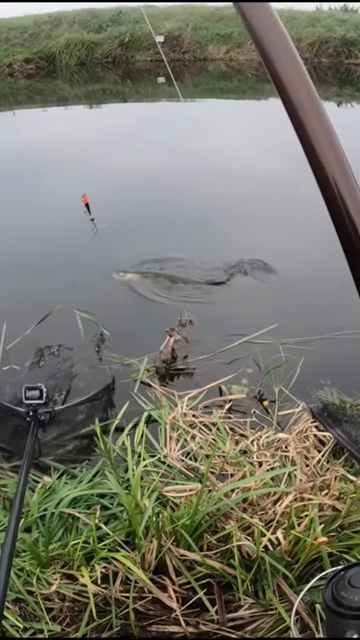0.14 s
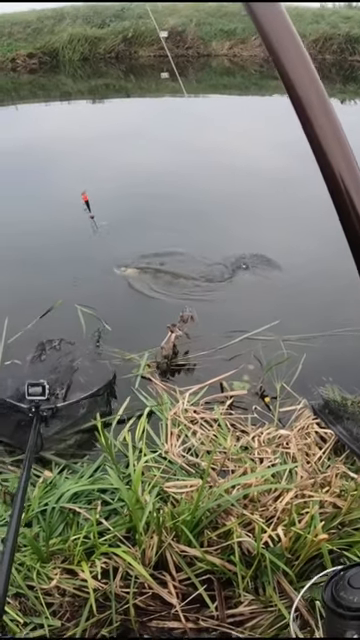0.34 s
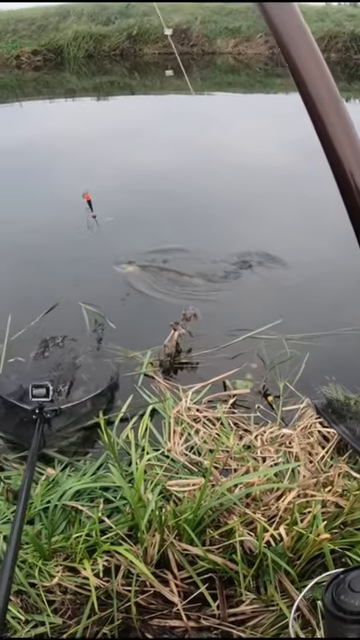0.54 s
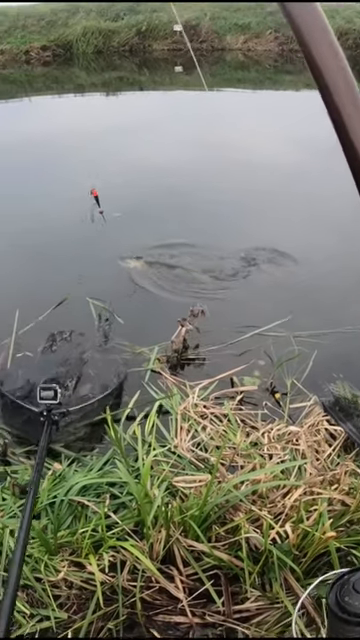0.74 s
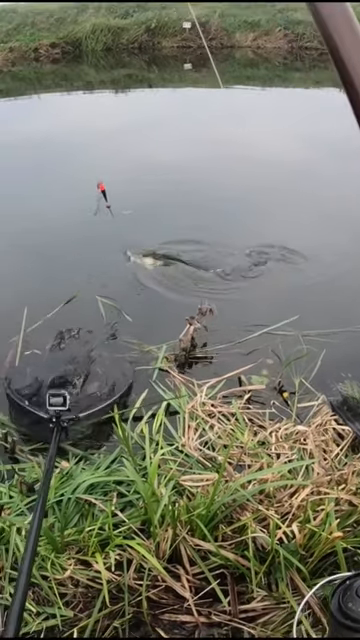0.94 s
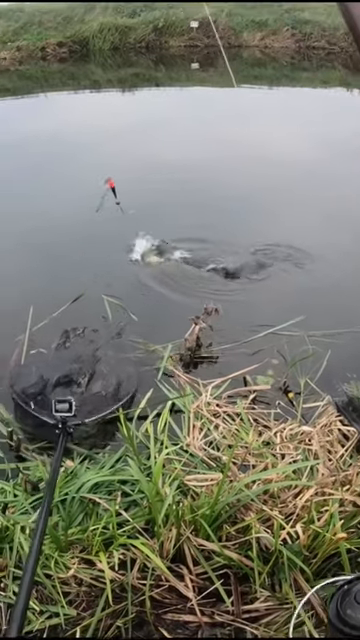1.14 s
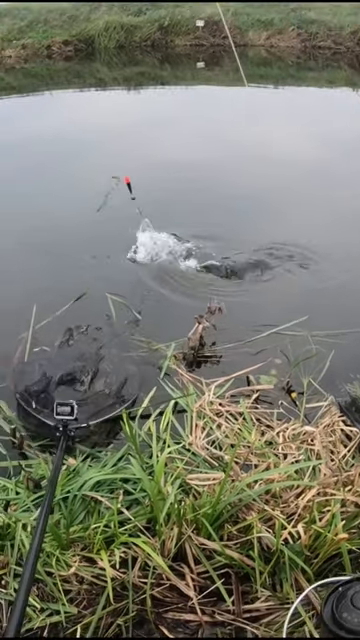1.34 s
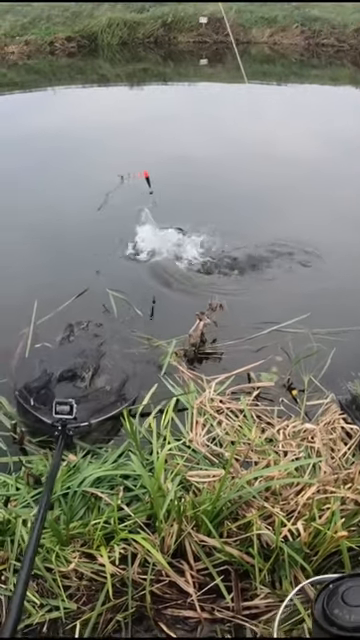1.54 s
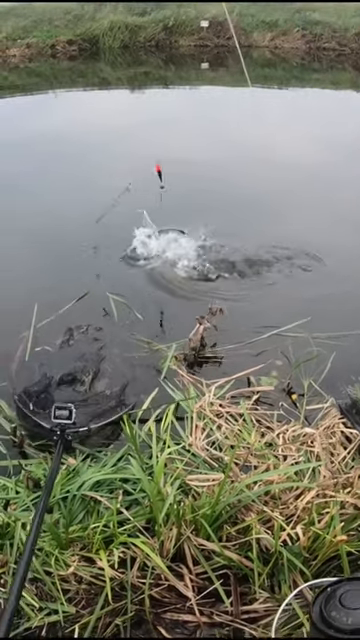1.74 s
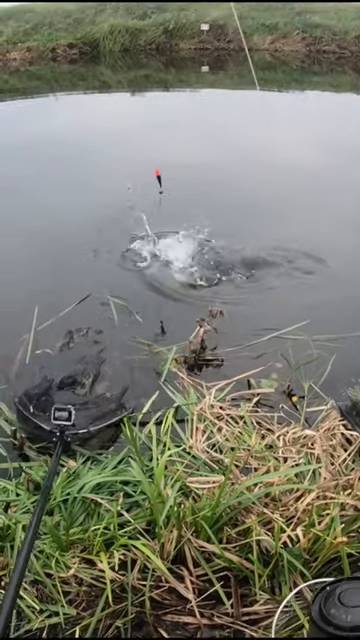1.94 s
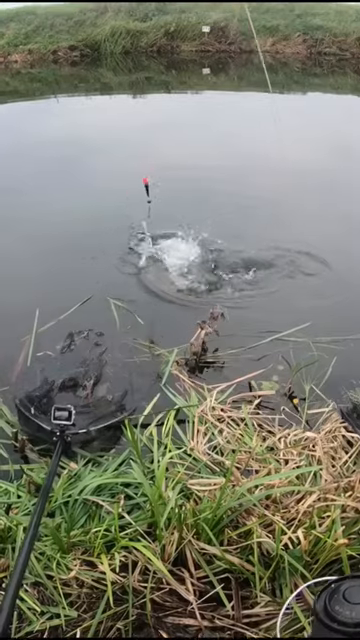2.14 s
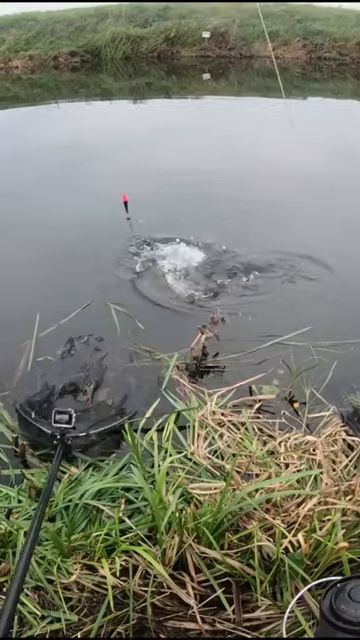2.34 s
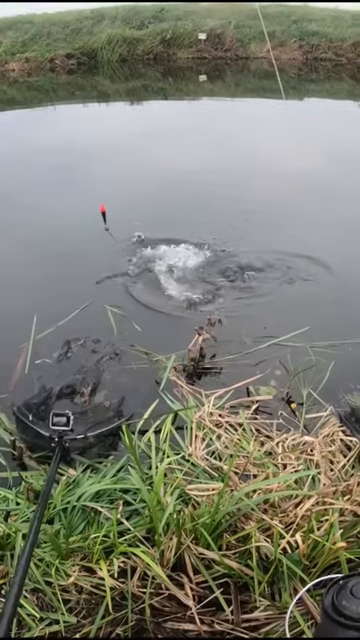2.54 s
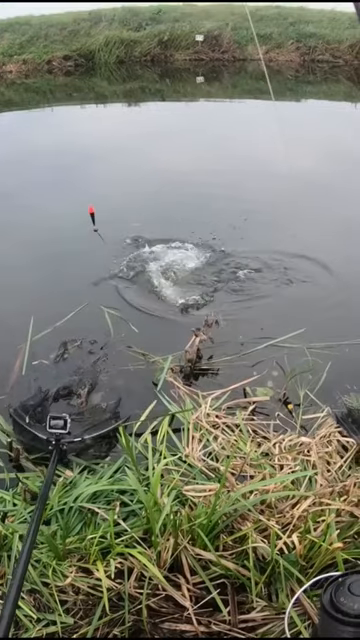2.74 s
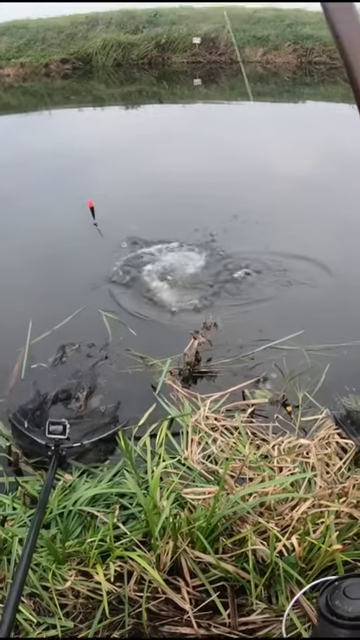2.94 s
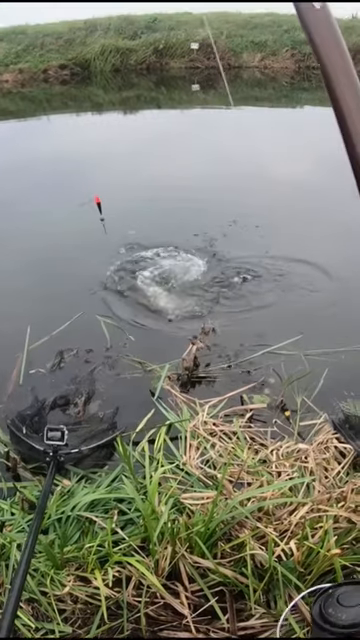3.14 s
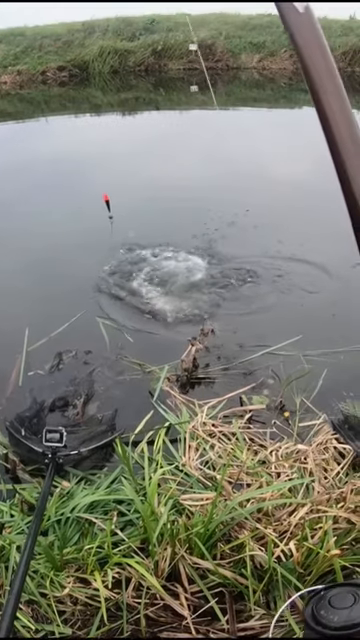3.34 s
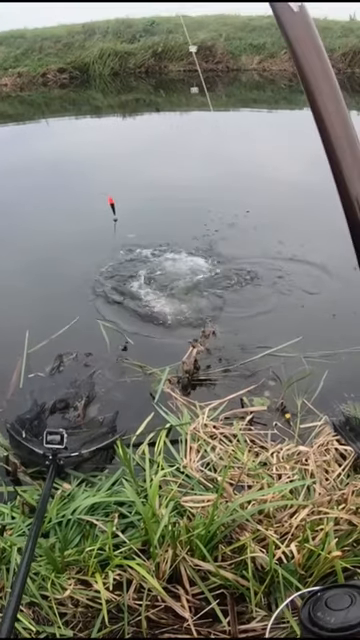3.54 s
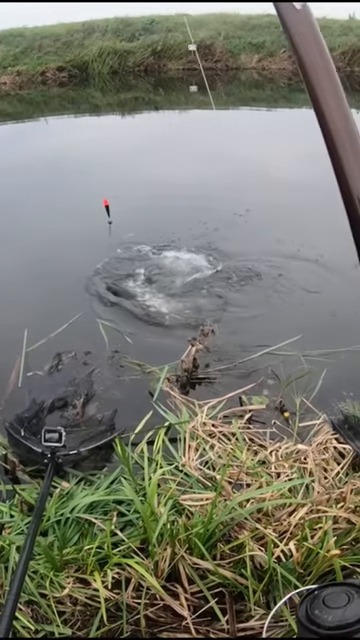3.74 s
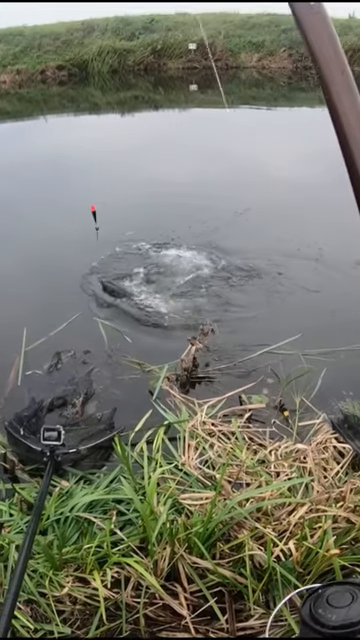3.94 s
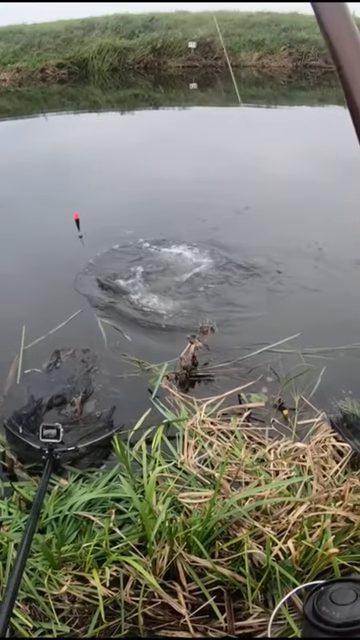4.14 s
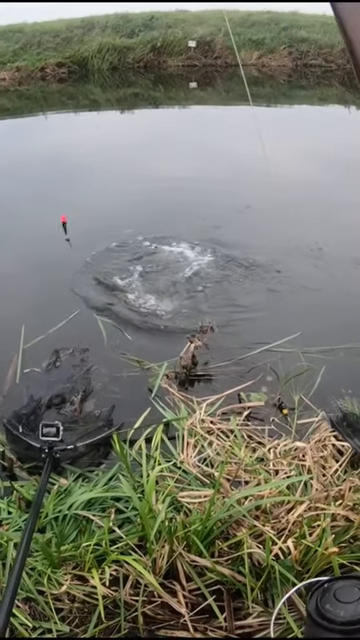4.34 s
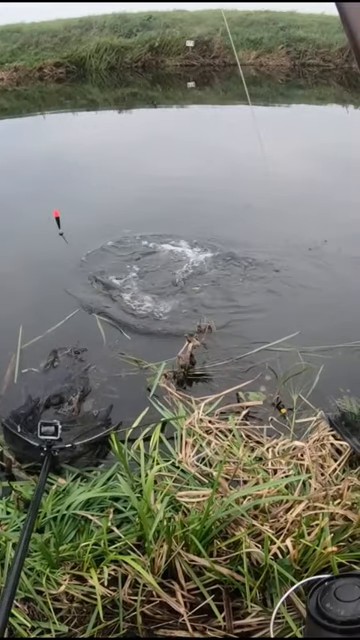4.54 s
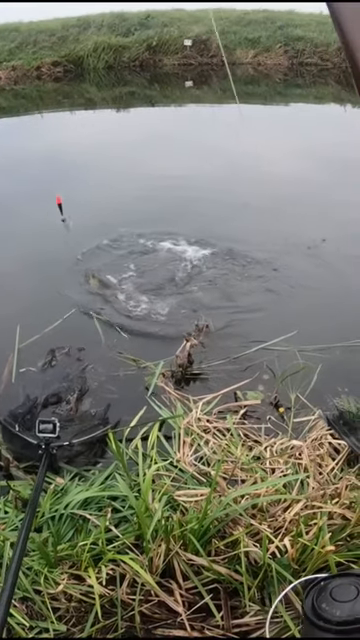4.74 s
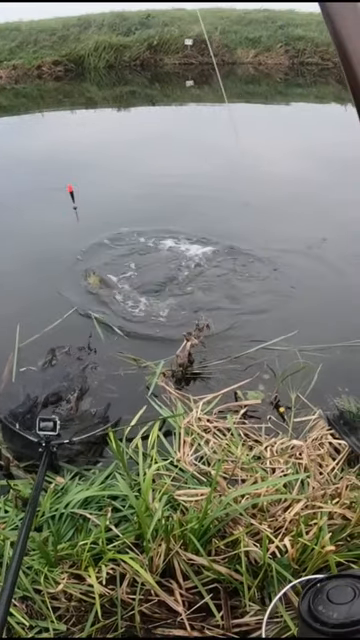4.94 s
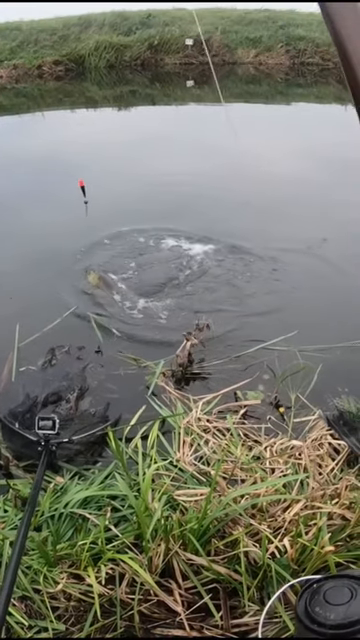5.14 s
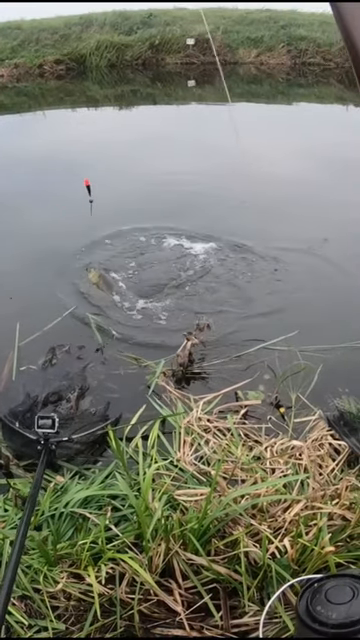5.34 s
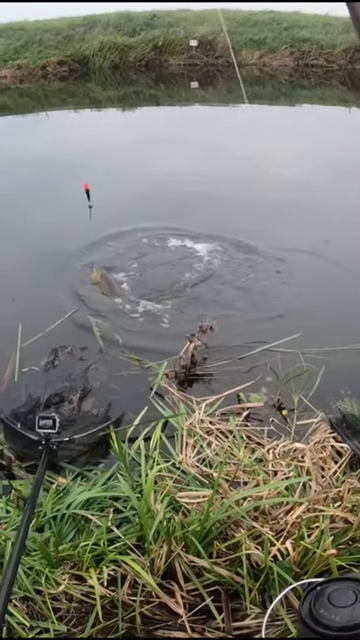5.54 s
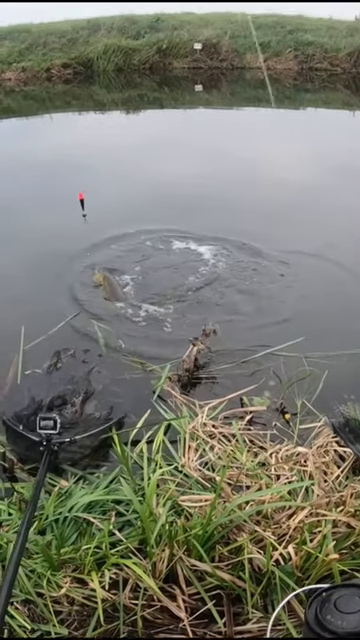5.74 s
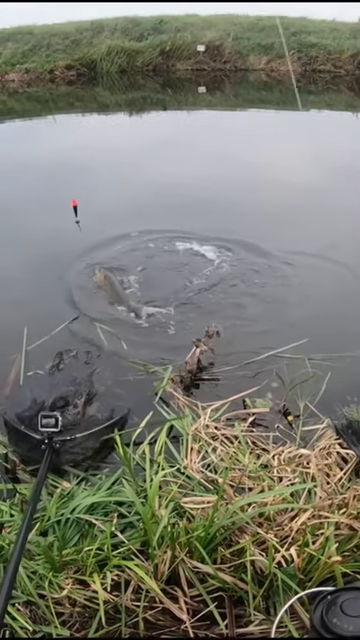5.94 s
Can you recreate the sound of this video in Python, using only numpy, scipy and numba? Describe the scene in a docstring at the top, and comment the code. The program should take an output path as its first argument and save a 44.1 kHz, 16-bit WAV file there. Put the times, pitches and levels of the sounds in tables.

```python
"""A hooked fish thrashes in a canal, heard from a camera in a waterproof case that muffles it and rings.
First come faint open air, the hum of the case, a light wind buffeting it and a few soft plops.
From about 0.9 s tail slaps and plunges throw up clouds of ringing bubbles and spray.
After 2 s the lunges weaken; drops fall back and single bubbles plop as the water settles,
and two last gusts press on the case."""
import sys
import numpy as np
from scipy import signal
from scipy.fft import rfft, irfft
from scipy.io import wavfile
from scipy.ndimage import uniform_filter1d
from numba import njit

SR = 44100
rng = np.random.default_rng(int(sys.argv[2]) if len(sys.argv) > 2 else 0)


def digitize_waveform(pressure):
    """Quantize a signal to 16-bit integers and store it at the path in sys.argv[1].

    Rows of a 2-D input are taken as channels; values are limited to [-1, 1].
    """
    field = np.atleast_2d(pressure).T
    bounded = np.clip(field, -1, 1)
    quanta = np.round(bounded * 32767).astype(np.int16)
    wavfile.write(sys.argv[1], SR, quanta)


N = 264159
TIME = np.arange(N) / SR
FREQS = np.maximum(np.arange(N + 1) * SR / (2 * N), 1)


def undb(db):
    """Decibels to gain."""
    return 10 ** (np.asarray(db) / 20)


def eq_curve(points):
    """Level in dB at every frequency, straight between the points on a log axis."""
    hz, db = np.transpose(points)
    return np.interp(np.log(FREQS), np.log(hz), db)


def colour(x, db):
    """Minimum-phase EQ with the given level at every frequency."""
    cepstrum = irfft(np.log(undb(db)))
    cepstrum[1:N] *= 2
    cepstrum[N + 1:] = 0
    return irfft(rfft(x, 2 * N) * np.exp(rfft(cepstrum)))[..., :N]


def waver(rate):
    """Smooth random modulation of unit spread, with rate new values a second."""
    hold = int(SR / rate)
    steps = np.repeat(rng.standard_normal(N // hold + 1), hold)
    slewed = uniform_filter1d(uniform_filter1d(steps, hold), hold)[:N]
    return slewed / slewed.std()


def envelope(start, length, rise_db_per_s, fall_db_per_s):
    """Attack, hold and release, in dB below the top."""
    attack = rise_db_per_s * np.maximum(start - TIME, 0)
    release = fall_db_per_s * np.maximum(TIME - start - length, 0)
    return -attack - release


def stereo_noise(likeness):
    """White noise, partly shared by the two microphone ports."""
    shared = rng.standard_normal(N)
    return np.sqrt(likeness) * shared + np.sqrt(1 - likeness) * rng.standard_normal((2, N))


def air():
    """A faint, wide bed of open-air hush that wavers a little."""
    # tone of quiet open air: (frequency [Hz], level [dB])
    spectrum = [(30, 20), (60, 2.5), (120, 9), (190, 11), (300, 9), (450, 1.5), (900, 1.5), (1200, -2),
                (1550, 5), (2100, -8.5), (3100, -15), (4200, -35), (13500, -36.5), (16000, -51.5)]
    hush = colour(stereo_noise(likeness=0.049), eq_curve(spectrum))
    return hush / hush.std() * undb(-64 + 1.1 * waver(rate=11))


def hum(hz=188, width_hz=30, level_db=-66):
    """The low resonance of the case hums, pushing on one port as it pulls on the other."""
    band_db = -10 * np.log10(1 + (2 * (FREQS - hz) / width_hz) ** 4)
    drone = colour(rng.standard_normal(N), band_db)
    return drone / drone.std() * undb(level_db) * np.array([[1], [-1]])


def wind(left_db=-5.5):
    """A breeze and a few gusts press slowly on the case, harder at the right port."""
    # tone of the buffeting: (frequency [Hz], level [dB])
    spectrum = [(1, -19), (4, 6.5), (14, -1.5), (19, -2), (27, -25), (36, -26.5), (45, -18), (60, -31.5),
                (90, -43.5), (140, -57), (300, -103.5)]
    # the breeze, then the gusts: (start [s], length [s], level on the right [dB])
    gusts = [(0.176, 5.63, -31), (1.0, 0.048, -22), (1.708, 0.2, -21), (4.79, 0.18, -25.5),
             (5.46, 0.18, -29)]
    buffet = colour(stereo_noise(likeness=0.26), eq_curve(spectrum))
    buffet /= buffet.std(axis=1, keepdims=True)
    swells_db = [db + envelope(start, length, rise_db_per_s=40, fall_db_per_s=54.5)
                 for start, length, db in gusts]
    return buffet * undb(np.max(swells_db, axis=0)) * undb([[left_db], [0]])


@njit
def ring(start, gain, hz, glide, life, swell, skew):
    """Each bubble swells, rings down and glides by a pitch ratio; skew shifts its phase at each port."""
    out = np.zeros((2, N))
    for k in range(len(start)):
        first, phase = max(int(start[k] * SR), 0), 0.
        for i in range(min(int(life[k] * (2 - swell[k]) * SR), N - first)):
            age = i / (life[k] * SR)
            if age < swell[k]:
                level = np.sin(np.pi / 2 * age / swell[k])
            else:
                level = np.exp(-3 * (age - swell[k]) / (1 - swell[k]))
            phase += 2 * np.pi * hz[k] * glide[k] ** min(age, 1.2) / SR
            out[0, first + i] += gain[k] * level * np.sin(phase + skew[k])
            out[1, first + i] += gain[k] * level * np.sin(phase - skew[k])
    return out


def plops():
    """Single bubbles chirp, most rising as they near the surface; moving water wobbles their level."""
    # single bubbles: (time [s], level [dB], start pitch [Hz], pitch after one life [Hz], life [s])
    bubbles = [(0, -53, 862, 805, 0.027), (0, -59, 489, 695, 0.072), (.015, -52.5, 173, 339, .135),
               (.535, -59.5, 675, 700, .025), (0.854, -49.5, 556, 667, .027),
               (.974, -28, 1384, 1380, 0.012), (1.225, -37, 292, 398, 0.048),
               (1.256, -29.5, 226, 310, 0.078), (1.263, -27.5, 334, 415, 0.021),
               (1.604, -36, 482, 498, 0.045), (1.803, -32.5, 3170, 4260, 0.01),
               (2.036, -29.5, 247, 305, .06), (2.075, -38.5, 702, 773, 0.038),
               (2.178, -30.5, 197, 244, 0.019), (2.185, -34, 1280, 1420, 0.017),
               (2.394, -33, 199.4, 337, 0.07), (2.582, -42.5, 823, 960, 0.024),
               (2.62, -37, 785, 1660, .011), (2.69, -35, 1030, 1330, 0.016), (2.893, -42, 702, 960, .037),
               (3.141, -44.5, 640, 1040, 0.013), (3.151, -41.5, 984, 1830, 0.0075),
               (3.354, -36.5, 1000, 2500, 0.0056), (3.586, -48.5, 207, 278, 0.073),
               (3.758, -47.5, 840, 848, .04), (3.783, -47.5, 876, 930, 0.024),
               (3.933, -43.5, 400, 377, 0.023), (3.957, -55, 390, 433, 0.052),
               (4.033, -51, 179, 193, 0.097), (4.113, -52, 183, 235, 0.053), (4.139, -53, 550, 600, .032),
               (4.528, -49.5, 1128, 1160, 0.026), (4.549, -51, 786, 710, 0.023),
               (4.707, -52.5, 1710, 1820, 0.019), (4.886, -56, 590, 760, 0.026)]
    start, db, hz, end_hz, life = np.transpose(bubbles)
    glide = end_hz / hz
    swell = np.clip(.16 + .66 * np.log2(glide), .1, .85)  # share of life: longer for a bigger climb
    chirps = ring(start, undb(db), hz, glide, life, swell, np.zeros(len(start)))
    return chirps * undb(1.8 * waver(rate=220) - 1.2)


def thrashing(rise_db_per_s=800):
    """Levels in dB of plunge, splash and spray: each lunge hits fast, holds and dies away."""
    # lunges of the fish: (start [s], length [s], plunge [dB], splash [dB], spray [dB])
    lunges = [(0, 0.024, -63.5, -70, -68), (0.899, 0.033, -66.5, -50.5, -67),
              (0.949, 0.042, -60.5, -40, -49), (1.005, 0.075, -42.5, -49, -60),
              (1.074, .05, -42.5, -42.5, -50), (1.128, .06, -37.5, -42, -41.5),
              (1.201, 0.044, -35, -38.5, -38.5), (1.261, 0.041, -28.5, -36, -38.5),
              (1.352, 0.038, -33, -43, -43.5), (1.403, 0.077, -36, -48.5, -50),
              (1.55, 0.026, -33, -58.5, -59), (1.595, 0.069, -35.5, -45, -47),
              (1.734, .075, -33.5, -49.5, -47), (1.84, 0.09, -35, -47.5, -50.5),
              (1.988, 0.11, -40.5, -47, -50.5), (2.138, 0.059, -43, -49.5, -51.5),
              (2.217, 0.017, -46, -45.5, -49), (2.303, 0.09, -48.5, -56, -56),
              (2.444, .03, -52.5, -54, -50.5), (2.622, 0.043, -60, -48.5, -53),
              (2.924, 0.087, -53, -57, -75), (3.495, 0.2, -66.5, -67, -76.5),
              (3.983, 0.22, -70, -64.5, -67), (4.256, 0.2, -65.5, -66, -67.5)]
    falls_db_per_s = 169.5, 118, 100.5  # plunge, splash, spray
    curves = []
    for k, fall in enumerate(falls_db_per_s):
        hits = [db[k] + envelope(start, length, rise_db_per_s, fall) for start, length, *db in lunges]
        curves.append(np.max(hits, axis=0))
    return curves


def stirred(lunge_db, response):
    """Level in dB of one bubble size: the lunges, the sloshing wash they leave, and calm water."""
    # broken water washing about before it settles: (start [s], length [s])
    wash_span = (1.177, 1.667)
    trim_db, wash_db, settling_db_per_s, calm_db = response
    contour_db = envelope(*wash_span, rise_db_per_s=299, fall_db_per_s=settling_db_per_s)
    slosh_db = 2 * waver(rate=18)
    wash = undb(wash_db + contour_db + slosh_db)
    return 10 * np.log10(undb(lunge_db + trim_db) ** 2 + wash ** 2 + undb(calm_db) ** 2)


def cloud(curve_db, band_hz, cycles, glide, scatter_db, skew, sparse_db, tries):
    """Bubbles born at random under a level curve; calmer water makes fewer of them."""
    when, pitch, lot, length, climb, heft, side = rng.random((tries, 7)).T
    low_hz, high_hz = band_hz
    start = when * N / SR
    hz = low_hz * (high_hz / low_hz) ** pitch
    life = cycles * 2 ** (2 * length - 1) / hz
    db = np.interp(start, TIME, curve_db)
    birth_chance = np.clip(10 ** ((db - np.max(curve_db)) / sparse_db), .02, 1)
    weight = undb(scatter_db * heft ** 2)
    # together they carry the power that the curve gives
    power = np.mean(weight ** 2) * birth_chance * tries * SR / N * life / 10
    gain = weight * undb(db) / np.sqrt(power)
    swell = np.full(tries, .15)
    columns = start, gain, hz, 1 + glide * climb ** 2, life, swell, skew * (2 * side - 1)
    return ring(*(column[lot < birth_chance] for column in columns))


def crackle(gain, ticks_per_s, scatter_db):
    """Tiny droplets tick on the surface, each panned at random."""
    lot, heft, pan = rng.random((3, N))
    ticks = (lot < ticks_per_s / SR) * undb(scatter_db * heft ** 3)
    return gain * ticks / ticks.std() * np.sqrt(2 * np.array([pan, 1 - pan]))


def churn():
    """The fish beats air into the water: plunges open cavities, splashes make small bubbles and spray."""
    # how each bubble size responds: (lunge trim [dB], wash [dB], settling [dB/s], calm water [dB])
    cavity_response = (-0.5, -57, 27, -84)
    big_response = (-1.5, -55.5, 14.5, -77)
    small_response = (-1, -54, 17.5, -78)
    spray_response = (0, -53.5, 19, -80)
    plunge_db, splash_db, spray_db = thrashing()
    drops_db = stirred(spray_db, spray_response)
    cavities = cloud(stirred(plunge_db, cavity_response), band_hz=(46, 135), cycles=3.4,
                     glide=0.033, scatter_db=7, skew=0.14, sparse_db=72, tries=1800)
    # big bubbles come from splash and plunge alike
    big = cloud(stirred((splash_db + plunge_db) / 2, big_response), band_hz=(171.5, 360.6), cycles=7.4,
                glide=0.54, scatter_db=3.5, skew=0.047, sparse_db=56, tries=2600)
    small = cloud(stirred(splash_db, small_response), band_hz=(366, 1170), cycles=5.44,
                  glide=0.33, scatter_db=5.5, skew=0.53, sparse_db=44, tries=9000)
    drops = cloud(drops_db, band_hz=(1141, 4200), cycles=8,
                  glide=0.23, scatter_db=9, skew=1, sparse_db=38.5, tries=16000)
    mist = crackle(undb(drops_db + 1.5 * waver(rate=45)), ticks_per_s=1100, scatter_db=11)
    return cavities + big + small + undb(0.5) * drops + undb(2.5) * mist


def slaps():
    """A slap smacks the surface, traps a pocket of air that rings briefly, and flings droplets."""
    # slaps of tail and falling water: (time [s], level [dB], pocket pitch [Hz], ring length [cycles])
    hits = [(.457, -54, 960, 5.6), (0.846, -43.5, 700, 4.2), (.909, -30.5, 469, 6.5),
            (0.919, -30.5, 1020, 3.6), (.933, -33, 712, 2.1), (.945, -27, 480, 5.2),
            (0.952, -27, 1500, 3.2), (.970, -24, 1145, 8), (0.99, -28, 698, 4.5), (1.085, -27.5, 620, 5),
            (1.097, -25.5, 864, 6.3), (1.115, -24, 612, 4), (1.141, -22.5, 650, 3.6),
            (1.189, -25.5, 637, 5), (1.229, -23.5, 581, 2), (1.275, -23.5, 660, 6.2),
            (1.287, -24.5, 1490, 4.3), (1.350, -26.5, 753, 8.2), (1.634, -33.5, 998, 2),
            (2.062, -36.5, 687, 12.4), (2.175, -37, 538, 8), (2.220, -30.5, 448, 6.8),
            (2.230, -36, 844, 14), (2.328, -28, 1395, 2.2), (2.523, -34.5, 600, 9), (2.556, -38, 1106, 4.6),
            (2.905, -31, 1650, 7.2), (2.997, -48, 790, 19), (3.089, -51, 760, 8), (3.285, -40, 1550, 7.7),
            (3.357, -39, 1906, 6), (3.509, -46, 1020, 4.9), (3.932, -37.5, 1074, 3.6),
            (4.038, -49.5, 620, 10.5), (4.078, -48, 810, 8), (5.142, -44, 1600, 12)]
    start, db, hz, cycles = np.transpose(hits)
    ones, centred = np.ones(len(start)), np.zeros(len(start))
    pockets = ring(start, undb(db), hz, glide=ones, life=cycles / hz, swell=0.12 * ones, skew=centred)
    smacks = ring(start, undb(db - 5), 1.47 * hz, glide=ones, life=2 / hz, swell=0.27 * ones, skew=centred)
    flung = undb(db - 16.5) * (hz / np.mean(hz)) ** 0.65  # sharper, higher slaps throw more spray
    return pockets + smacks + spatter(start, flung)


def spatter(start, gain, fade_s=.006):
    """Flung droplets: a short burst of ticks at each slap."""
    blows = np.bincount((start * SR).astype(int), gain, N)
    bursts = signal.lfilter([1], [1, -np.exp(-1 / (fade_s * SR))], blows)
    return crackle(bursts, ticks_per_s=3000, scatter_db=9)


def through_case(water):
    """The case dulls the water and rings differently at each port."""
    # what the wall lets through: (frequency [Hz], gain [dB])
    wall = [(40, -0.5), (250, 1), (480, -3), (600, 0), (900, .5), (1150, -10), (1850, -4), (2100, -16),
            (2650, -23.5), (3700, -30), (4500, -54), (7000, -54), (15000, -77.5)]
    # resonances and notches of the case: (frequency [Hz], width [Hz], left [dB], right [dB])
    modes = [(108, 360, -5, 5), (132, 30, -2, -10), (282, 45, 2, -2), (329.7, 62.4, -1, -20),
             (377, 35, 4.5, 5), (1463, 200, 6.5, 6)]
    # panel resonances that delay the sound at the right port: (frequency [Hz], width [Hz])
    panels = [(1600, 34), (2040, 87), (2620, 42)]
    ports = []
    for k, side in enumerate(water):
        modes_db = sum(db[k] / (1 + (2 * (FREQS - hz) / width) ** 2) for hz, width, *db in modes)
        ports.append(colour(side, eq_curve(wall) + modes_db))
    left, right = ports
    for hz, width in panels:
        radius = np.exp(-np.pi * width / SR)
        poles = np.array([1, -2 * radius * np.cos(2 * np.pi * hz / SR), radius ** 2])
        right = signal.lfilter(poles[::-1], poles, right)  # all-pass
    return np.array([left, right])


def scene():
    """Water heard through the case, over a bed of wind, air and hum."""
    return through_case(churn() + slaps() + plops()) + wind() + air() + hum()


def record(dry, mirror_hz=12000, top_hz=14600):
    """The camera's resampler mirrors the upper mids faintly into the treble; then the top is cut."""
    # tone of the mirror image: (frequency [Hz], gain [dB])
    image_eq = [(4500, -26.5), (7500, -8.5), (8500, 3.5), (10500, -1.5), (13500, -5.0), (15000, -10.5)]
    upper_mids = signal.lfilter([1, -2, 1], [1], dry)
    image = colour(upper_mids * np.cos(2 * np.pi * mirror_hz * TIME), eq_curve(image_eq))
    high_cut = signal.ellip(8, .2, 70, top_hz, fs=SR, output="sos")
    return signal.sosfilt(high_cut, dry + image)


dry = scene()
out = record(dry)
digitize_waveform(out)
```